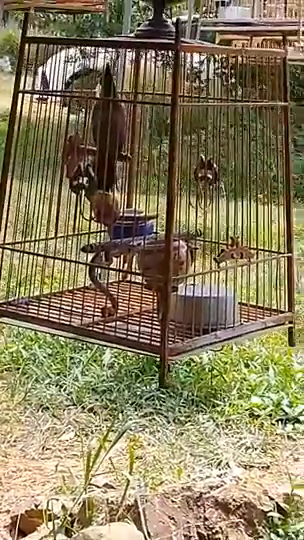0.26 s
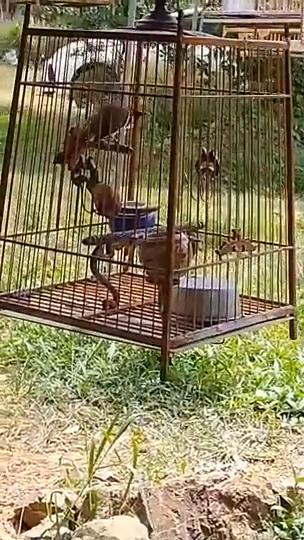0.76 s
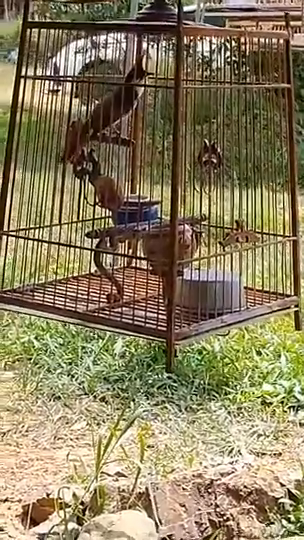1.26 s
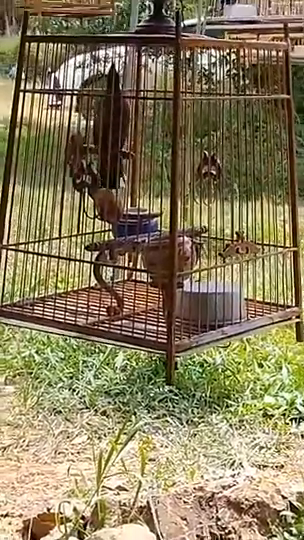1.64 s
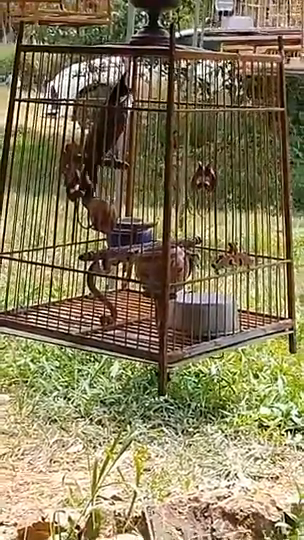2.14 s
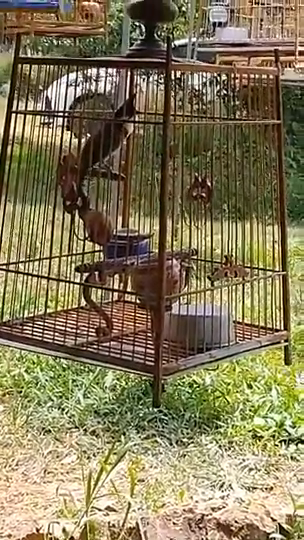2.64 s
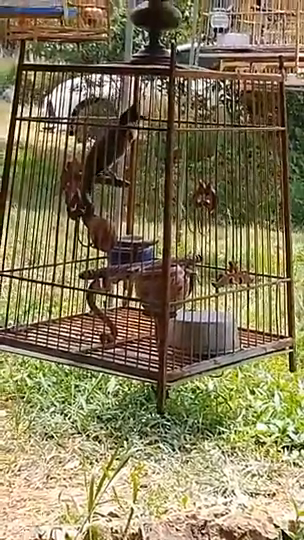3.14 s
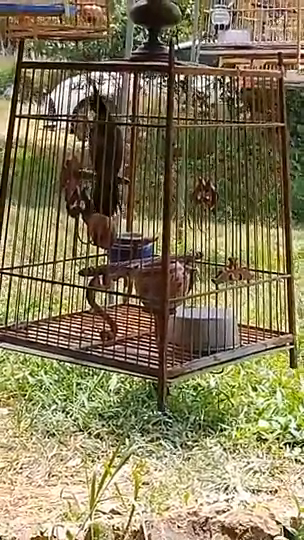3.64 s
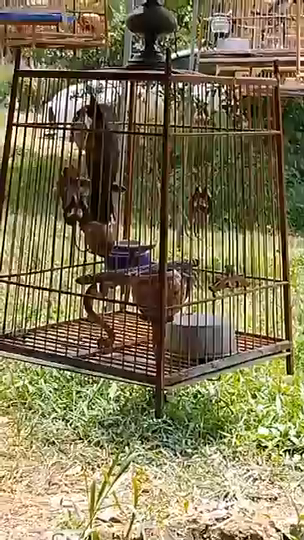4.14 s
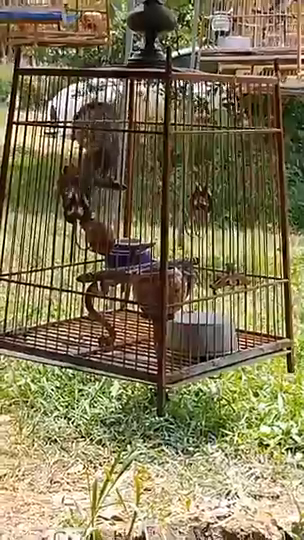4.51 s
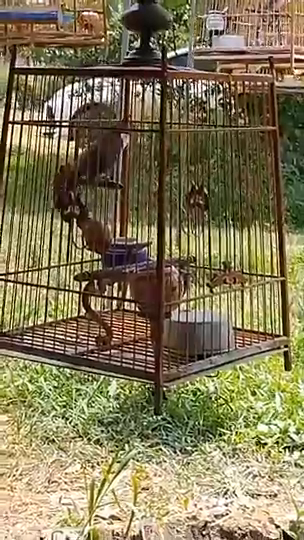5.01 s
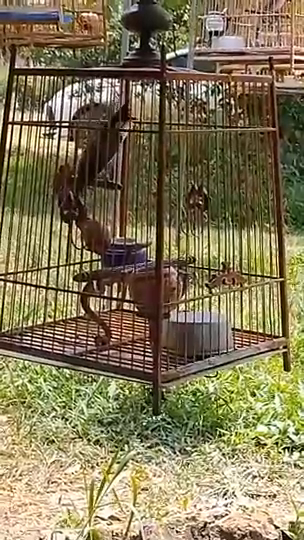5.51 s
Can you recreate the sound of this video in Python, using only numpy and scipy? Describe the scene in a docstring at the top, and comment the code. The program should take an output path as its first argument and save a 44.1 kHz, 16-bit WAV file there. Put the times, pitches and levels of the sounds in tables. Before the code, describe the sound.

A close songbird in an open cage gives fast, slurred whistles and slightly buzzy sweeps in short bursts, with gaps where fainter birds and soft low calls answer from farther off. Light outdoor echo follows the notes. Beneath are flickering high hiss, low air noise, a faint wavering hum and a few soft microphone bumps. Near the end comes a single dry clack.

```python
"""A caged songbird sings quick phrases of slurred whistles and buzzy sweeps in a garden: gliding tones
with faint overtones, roughened by a fast trill. Random echo patterns stand for walls and other cages.
More birds and soft low calls, built the same way, sound from farther off. Under them lie outdoor noise
with a flickering hiss, a faint wavering hum and low bumps; near the end something gives one dry clack."""
import sys
import numpy as np
from scipy import signal
from scipy.fft import rfft, irfft
from scipy.io import wavfile
from scipy.ndimage import uniform_filter1d

SR = 44100
rng = np.random.default_rng(int(sys.argv[2]) if len(sys.argv) > 2 else 0)


def transcribe(u):
    """Save the signal u as a 16-bit wav file named by the first command-line argument.

    u: samples, shape (n,) or (channels, n), limited to [-1, 1]; the rate is SR.
    q: integer samples, one column per channel.
    """
    v = np.clip(np.atleast_2d(u).T, -1, 1)
    q = np.round(v * 32767).astype(np.int16)
    wavfile.write(sys.argv[1], SR, q)


N = 254456  # samples


def gain_of(db):
    """Level to amplitude: 20 dB is a factor of ten in pressure."""
    return 10 ** (np.asarray(db) / 20)


def evened(x):
    """Normalisation to unit root-mean-square amplitude."""
    return x / np.sqrt(np.mean(x ** 2) + 1e-20)


def read(points, hz):
    """Interpolation along a logarithmic frequency axis, flat beyond the end points."""
    point_hz, value = np.transpose(points)
    return np.interp(np.log(hz + 1), np.log(point_hz + 1), value)


def add(mix, start_s, sound):
    """Superposition: pressures sum, with any part before time zero cut off."""
    at = round(start_s * SR)
    sound = sound[max(0, -at):]
    part = mix[max(0, at):][:len(sound)]
    part += sound[:len(part)]


def noise(lo_hz, hi_hz):
    """Band-limited Gaussian noise of rms 1, its spectrum falling smoothly beyond both edges."""
    hz = np.fft.rfftfreq(N, 1 / SR) + 1e-3
    spectrum = rfft(rng.standard_normal(N))
    band = spectrum / (1 + (lo_hz / hz) ** 4) / (1 + (hz / hi_hz) ** 4)
    return evened(irfft(band, N))


def note(start_s, length_s, from_hz, to_hz, db, swell_db, rough, attack_s, release_s):
    """Exponential relaxation of pitch towards its goal, under a loudness that eases in, arches and lets go."""
    margin_s = 0.05  # room for the soft ends
    settle = 1.82  # time constants in a note: the pitch moves fast at first, then settles
    arch_db = 0.5  # a note is this much weaker at its ends than in its middle
    t = np.arange(-margin_s, length_s + margin_s, 1 / SR)
    progress = np.clip(t / length_s, 0, 1)
    hz = from_hz + (to_hz - from_hz) * np.expm1(-settle * progress) / np.expm1(-settle)
    opening = .5 + .5 * np.tanh(t / attack_s)
    closing = .5 + .5 * np.tanh((length_s - t) / release_s)
    level_db = db + swell_db * (progress - .5) - arch_db * (2 * progress - 1) ** 2
    return start_s + t, hz, gain_of(level_db) * opening * closing, np.clip(rough, 0, 1)


def sing(notes, trill_hz, trill_depth, rasp, flutter, attack_s, release_s):
    """Frequency and amplitude modulation in a syrinx: a trill shakes a gliding tone as far as it is rough."""
    # strength of the overtones against the whistle, by where they fall: overtone_hz, level_db
    overtones = [(3500, -44), (5500, -45.5), (7500, -54), (9000, -70), (10200, -49), (11200, -48),
                 (12000, -70)]
    out = np.zeros(N)
    wobble = noise(27, 190)
    jitter = np.tanh(noise(97, 450))
    for row in notes:
        t, hz, size, rough = note(*row, attack_s, release_s)
        at = np.clip((t * SR).astype(int), 0, N - 1)
        # the trill is never quite even
        trill = np.sin(2 * np.pi * np.cumsum(trill_hz * (1 + 0.22 * wobble[at])) / SR)
        shake = rough * (trill_depth * trill + rasp * jitter[at])
        pitch = hz * (1 + 0.013 * wobble[at] + shake)
        phase = 2 * np.pi * np.cumsum(pitch) / SR
        tone = np.sin(phase)
        for k in range(2, 5):
            tone += gain_of(read(overtones, k * hz)) * np.sin(k * phase)
        loudness = size * (1 - flutter * rough * (trill + jitter[at]))
        add(out, t[0], np.sqrt(2) * loudness * tone)
    # a note already under way at the start fades in softly
    return out * np.tanh(np.arange(N) / SR / .001) ** 2


def dying(x, ring):
    """Frequency-dependent exponential decay: each band falls 60 dB in its own ring time."""
    hz, t, z = signal.stft(x, SR, nperseg=256)
    decay = gain_of(-60 * t / read(ring, hz)[:, None])
    return signal.istft(z * decay, SR, nperseg=256)[1][:len(x)]


def echoes(x, ring, first_s):
    """Convolution with scattered reflections from cages, walls and leaves, beginning after first_s."""
    t = np.arange(SR) / SR
    struck = rng.random(SR) < 2000 / SR  # about 2000 reflections a second
    taps = rng.choice([-1., 1.], SR) * struck * (t > first_s)
    tail = dying(taps, ring)
    return signal.fftconvolve(x, tail / np.linalg.norm(tail))[:N]


def wash(colour, patchy_db):
    """Spectrally shaped noise of rms 1 whose level drifts in small patches of time and frequency."""
    frames, hz = N // 256 + 5, np.fft.rfftfreq(1024, 1 / SR)
    real, imaginary, patches = rng.standard_normal((3, frames, len(hz)))
    patches = uniform_filter1d(patches, size=12, axis=0)
    patches = evened(uniform_filter1d(patches, size=6, axis=1))
    z = (real + 1j * imaginary) * gain_of(read(colour, hz) + patchy_db * patches)
    return evened(signal.istft(z.T, nperseg=1024, noverlap=768)[1][:N])


def air():
    """Amplitude-modulated broadband noise: a flickering hiss takes the upper air with it as it sinks."""
    # relative spectrum of the outdoor air: hz, density_db (per Hz)
    air_colour = [(20, -2), (50, -16), (90, -0.5), (135, -1), (175, -5.5), (255, -0.5), (340, -7.5),
                  (600, -9.5), (1400, -8), (2200, 0.5), (3000, -10), (4000, -9), (4900, -20.5)]
    # relative spectrum of the high hiss over it: hz, density_db (per Hz)
    hiss_colour = [(4000, -25.5), (5000, -5.5), (5700, 2), (6600, -8), (8100, 0), (8900, -15.5),
                   (10200, -11), (11800, -37.5), (13200, -32), (14500, -24), (15600, -14.5)]
    # the hiss swells or eases for a moment: middle_s, half_length_s, change_db
    hiss_swells = [(0.095, 1, 3), (1.371, 0.055, -2), (1.69, 0.041, -2.5), (2.987, 0.047, -5),
                   (3.37, 0.05, -9.5), (4.246, 0.41, -1.5), (4.672, .05, -12.5)]
    air_db, hiss_db = -41, -55
    fade_s, fade_db_per_s = 5.49, 75  # the hiss sinks away at the end
    t = np.arange(N) / SR
    flicker_db = 2.1 * noise(3, 12)
    swell_db = sum(db * np.exp(-((t - middle) / half) ** 2) for middle, half, db in hiss_swells)
    fade_db = fade_db_per_s * np.maximum(t - fade_s, 0)
    hiss = gain_of(hiss_db + swell_db - fade_db + flicker_db)
    body = gain_of(air_db) * wash(air_colour + [(6000, -45)], patchy_db=1.8)
    fizz = wash(hiss_colour, patchy_db=2.6)
    low = signal.sosfiltfilt(signal.butter(2, 2200, fs=SR, output="sos"), body)
    return low + (body - low) * hiss / np.median(hiss) + hiss * fizz


def hum():
    """Slow random modulation: low tones waver in pitch and level as they carry across the garden."""
    # a distant machine, one row a tone, before the wavering: pitch_hz, level_db
    hum_tones = [(247, -54), (277, -53), (470, -65), (885, -61), (1035, -65.5)]
    out = np.zeros(N)
    for hz, db in hum_tones:
        phase = 2 * np.pi * np.cumsum(hz + 5.4 * noise(0.72, 18.3)) / SR
        level_db = db + 2.88 * noise(0.48, 3.4)
        out += np.sqrt(2) * gain_of(level_db) * np.sin(phase)
    return out


def bumps(swell_s=0.0169):
    """Damped oscillation: each bump swells and dies within a few slow cycles."""
    # soft low bumps on the microphone, timed at the height of the swell: peak_s, level_db, pitch_hz
    bump_list = [(0.344, -39.5, 71.5), (0.88, -41.5, 100), (.97, -44.5, 76.5), (2.83, -43, 76),
                 (3.5, -43.5, 140)]
    out, t = np.zeros(N), np.arange(SR // 4) / SR
    envelope = t / swell_s * np.exp(1 - t / swell_s)
    for peak_s, db, hz in bump_list:
        tone = np.sqrt(2) * gain_of(db) * np.sin(2 * np.pi * hz * t)
        add(out, peak_s - swell_s, envelope * tone)
    return out


def clack(rise_s=0.0034, hold_s=0.0043, fall_s=0.016, tail_db=-9):
    """Impulsive excitation and reverberant decay: a short splintery crack, then its ring in the yard."""
    # the clack, its level that of the noise before its envelope: start_s, level_db
    start_s, level_db = (5.487, -19)
    # its relative spectrum: hz, density_db (per Hz)
    clack_colour = [(200, -9), (450, -18), (1400, -6.5), (2000, 1), (2800, 0), (3700, -5), (4500, 3),
                    (5300, -16), (6000, -6.5), (6800, -16), (8000, -11), (9000, -21), (13000, -42),
                    (15500, -33)]
    # its ring, as the time to fall 60 dB: hz, t60_s
    clack_ring = [(500, 1), (3000, 0.35), (8000, 0.28), (15000, 0.43)]
    t, hz = np.arange(SR) / SR, np.fft.rfftfreq(SR, 1 / SR)
    colour = gain_of(read(clack_colour, hz))
    crack, tail = (evened(irfft(rfft(rng.standard_normal(SR)) * colour, SR)) for _ in range(2))
    crack = crack * np.exp(-np.maximum(t - hold_s, 0) / fall_s)
    sound = crack + gain_of(tail_db) * dying(tail, clack_ring)
    out = np.zeros(N)
    add(out, start_s, gain_of(level_db) * np.minimum(t / rise_s, 1) * sound)
    return out


def scene():
    """Direct-to-reverberant balance: the near bird is mostly direct, the far ones are half echo."""
    # the caged bird, one row a note; notes overlap where both sides of the syrinx sound; levels are
    # relative, swell runs from start to end:
    # start_s, length_s, from_hz, to_hz, level_db, swell_db, roughness (0-1)
    song_notes = [ (-.005, 0.0084, 2595, 2453, 2.5, -12, 0.23), (.062, 0.01, 2580, 2430, -26, -4, 0.04),
                  (.075, 0.034, 3170, 3687, -17.5, 2, 0.26), (.165, .015, 2703, 2120, -20, 0, 0.02),
                  (.181, 0.01, 2220, 2450, -7.5, -2, 0.13), (.194, 0.024, 2960, 3134, -25, 4, 0.3),
                  (.217, 0.0099, 3144, 3285, -11.5, -5, 0), (.229, 0.036, 3380, 3480, -19.5, -1, .5),
                  (.256, 0.0071, 3300, 2750, -22, -1, 0.54), (.321, .023, 2460, 2290, -14.5, 6.5, 0.37),
                  (.345, 0.044, 1875, 1872, -16, -6.5, 0.03), (1.593, 0.0082, 2650, 2720, -24, 0, .15),
                  (1.59, 0.022, 1600, 2007, -30.5, 5.5, .05), (1.613, 0.013, 2375, 2473, -5.5, -2, 0.09),
                  (1.633, 0.015, 3130, 3080, -16.5, 5, .05), (1.652, 0.0068, 2930, 2640, -11.5, -1, 0.06),
                  (1.659, 0.017, 2450, 2425, -8.5, 4, 0.13), (1.676, 0.012, 1947, 1520, -30.5, -7, 0.2),
                  (1.97, .036, 3746, 3906, -19.5, 10, 0.64), (2.093, 0.033, 2452, 2013, -24, -1, .35),
                  (2.123, 0.012, 2310, 2650, -8.5, 1, 0.56), (2.139, 0.02, 3440, 3360, -22, -3, 0.1),
                  (2.239, 0.013, 2320, 2590, -22, -2, 0.37), (2.258, 0.016, 2980, 3087, -11, -4, 0.23),
                  (2.278, 0.027, 3154, 3250, -17.5, -8.5, 0), (2.309, 0.018, 2480, 2144, -15.5, 0, 0),
                  (2.331, .032, 2350, 2408, -9.5, -2, 0.13), (2.374, 0.038, 2620, 2853, -17, -11, 0.36),
                  (2.49, 0.024, 2350, 2150, -25.5, 7, 0.5), (2.518, 0.071, 1777, 1733, -41.5, -7, 0),
                  (2.737, 0.039, 2786, 3110, -25.5, -1, 0.38), (2.776, 0.056, 3297, 3377, -26.5, -2, 0.36),
                  (2.795, 0.021, 3770, 4250, -36.5, -6, .4), (2.894, 0.013, 2350, 2500, -25, 4, 0.1),
                  (2.905, 0.044, 2830, 2530, -34.5, -12, .17), (2.979, 0.029, 3020, 2643, -26, 4, 0.24),
                  (3.02, 0.015, 1817, 2170, -28.5, 9, 0.3), (3.036, 0.023, 2236, 2296, -19, -7, 0.04),
                  (3.243, .021, 2425, 2330, -28, 1, 0.25), (3.264, .015, 2280, 1820, -26.5, 3, 0),
                  (3.283, 0.013, 2410, 2810, -29.5, -3, .7), (3.302, 0.012, 2215, 2125, -14.5, -13, 0.49),
                  (3.317, 0.019, 1997, 1690, -20.5, -11, 0), (3.318, 0.1, 2195, 2302, -28, -12, 0.7),
                  (3.44, 0.0056, 2220, 2400, -18, -6, 0.4), (3.449, .057, 2565, 3080, -29.5, -10, 0.44),
                  (3.512, 0.032, 2270, 1897, -24, -2, 0.25), (3.538, .064, 2283, 3727, -19, -13.5, 0.51),
                  (3.658, 0.04, 2260, 2174, -19.5, 8.5, .1), (3.716, 0.028, 2884, 3066, -14.5, 3, 0.14),
                  (3.772, .01, 2220, 2230, -25, 0, .08), (3.788, 0.014, 2840, 2710, -28, 8.5, 0.3),
                  (3.807, 0.031, 2486, 2050, -22, 3, 0.3), (3.81, 0.032, 1494, 2120, -21.5, 8, 0.3),
                  (3.839, 0.012, 2290, 2504, -7, -3, 0.15), (3.852, .02, 2550, 2624, -9, -3, 0),
                  (3.88, 0.038, 3280, 3580, -33, -8, 0.46), (3.896, 0.013, 2860, 2842, -12, -2, .1),
                  (3.93, 0.036, 1894, 2270, -18.5, 3, 0.35), (4.672, 0.016, 2485, 2195, -19.5, -2, 0.37),
                  (4.69, 0.037, 1704, 1665, -26.5, 5, 0), (4.687, 0.052, 3490, 3650, -28.5, 2.5, 0.7),
                  (4.796, 0.044, 2080, 2490, -27, -2, 0.1), (4.842, .042, 2830, 3040, -27, 2, 0.63),
                  (4.889, 0.047, 2246, 3550, -17, -1, 0.42), (4.942, 0.032, 3674, 3627, -15.5, -8, 0.23),
                  (5.062, 0.024, 2800, 2934, -16, -4, 0.16), (5.146, 0.024, 1627, 1837, -28, 3.5, 0),
                  (5.165, 0.036, 2280, 2528, -16, 4.5, 0.05),
                  (5.221, 0.0064, 2730, 2380, -14.5, -7.5, 0.27),
                  (5.235, 0.0096, 2910, 3080, -12.5, -5, 0.3), (5.254, .017, 2394, 2438, -6, 3.5, 0.11),
                  (5.278, 0.037, 1720, 1639, -23.5, -1, 0.05), (5.322, 0.037, 1812, 1928, -17, -4.5, 0.21),
                  ]
    # birds farther off, same columns; roughness above 1 counts as 1
    neighbour_notes = [ (.425, 0.023, 2700, 3594, -38, 9, 0.28), (.453, 0.02, 3520, 3060, -39, -4, 0.37),
                       (.755, 0.068, 2100, 1816, -38, 1, 0.82), (.875, 0.019, 2234, 1790, -30.5, -9, 0.2),
                       (.922, 0.033, 2020, 3645, -30.5, -11, .4), (.958, 0.049, 1996, 2370, -35.5, 0, 0.5),
                       (1.158, 0.026, 1738, 2590, -27, 7.5, 0.7),
                       (1.195, 0.053, 2750, 3750, -36.5, -2, 0.3),
                       (1.32, 0.045, 2130, 2114, -36.5, -11, 0.34),
                       (1.495, 0.082, 2990, 3165, -35, -1.5, 0.6), (3.385, .045, 2950, 4160, -41, -12, 1.1),
                       (4.195, 0.054, 3630, 3260, -38, -4, 0.46),
                       (4.255, 0.069, 2220, 2227, -40.5, -12, 0.2), (4.285, .065, 3110, 2457, -36, 2, 0.3),
                       (4.448, .032, 2170, 2053, -30.5, 1, 0.04), (4.485, .045, 2680, 2955, -33, -5, 0.6),
                       (4.58, .057, 3130, 2830, -38.5, -7, 0.3), (4.59, 0.076, 1448, 2070, -39, 19, .7),
                       (5.539, .06, 2100, 1953, -32, -4, 0), ]
    # soft low calls from far away: start_s, length_s, from_hz, to_hz, level_db
    coo_notes = [ (.01, 0.1, 435, 450, -51), (0.564, 0.11, 391, 412, -53), (.95, 0.1, 734, 703, -45.5),
                 (1.46, 0.092, 456, 476.5, -46), (3.05, 0.11, 456, 461, -51),
                 (4.568, 0.056, 1460, 1340, -43.5), (4.627, 0.094, 1120, 1014, -45.5), ]
    # the more the bird turns its beak away, the stronger the echoes: time_s, change_db
    turned = [(0, -6), (1.599, -3), (2.35, -2), (3.35, 1), (3.65, -4), (5.3, -4.5)]
    # ring time of the close echoes off cage, ground and wall: hz, t60_s
    close_ring = [(1500, 0.066), (4000, 0.052)]
    # ring time of the yard: hz, t60_s
    yard_ring = [(1000, 0.49), (2300, 0.25), (3500, 0.35), (10000, 0.23)]

    near = sing(song_notes, trill_hz=268.1, trill_depth=0.16, rasp=0.015, flutter=0.35,
                attack_s=0.0039, release_s=0.0025)
    coos = [(*row, 0, 0.1) for row in coo_notes]  # no swell, slight roughness
    far = sing(neighbour_notes + coos, trill_hz=141.3, trill_depth=0.11, rasp=0.15, flutter=0.21,
               attack_s=0.013, release_s=0.016)
    thrown = near * gain_of(np.interp(np.arange(N) / SR, *np.transpose(turned)))
    # close echoes beat against each glide and make it grainy; later ones hold its pitch after it ends
    close = gain_of(-2.5) * echoes(thrown, close_ring, first_s=0.002)
    late = gain_of(-10.5) * echoes(thrown, yard_ring, first_s=0.016)
    distant = gain_of(-2.5) * far
    distant += gain_of(-7) * echoes(far, close_ring, first_s=0.001)
    distant += gain_of(-7) * echoes(far, yard_ring, first_s=0.0028)
    birds = gain_of(-1.82) * near + close + late + distant
    return (birds + air() + hum() + bumps() + clack())[None]


def record(dry):
    """Low-pass filtering: the recorder's band limit at 15850 Hz."""
    lowpass = signal.firwin(511, 15850, window=("kaiser", 9), fs=SR)
    return signal.oaconvolve(dry, lowpass[None], "same")


dry = scene()
out = record(dry)
transcribe(out)
```